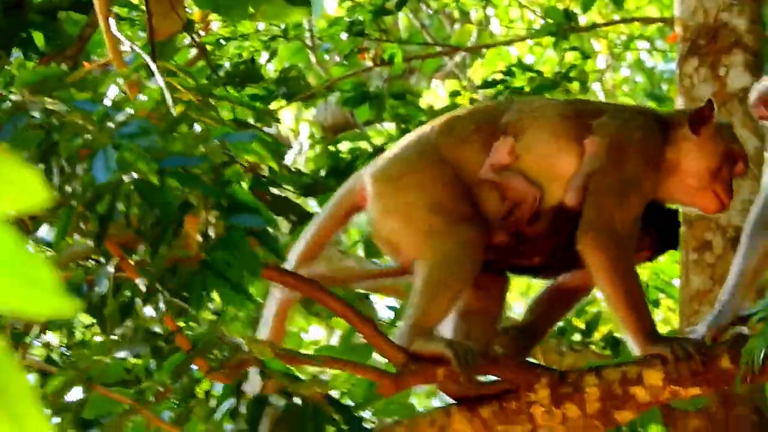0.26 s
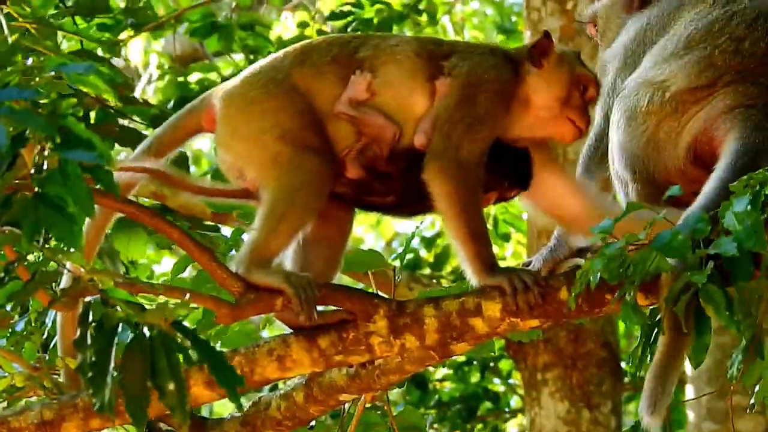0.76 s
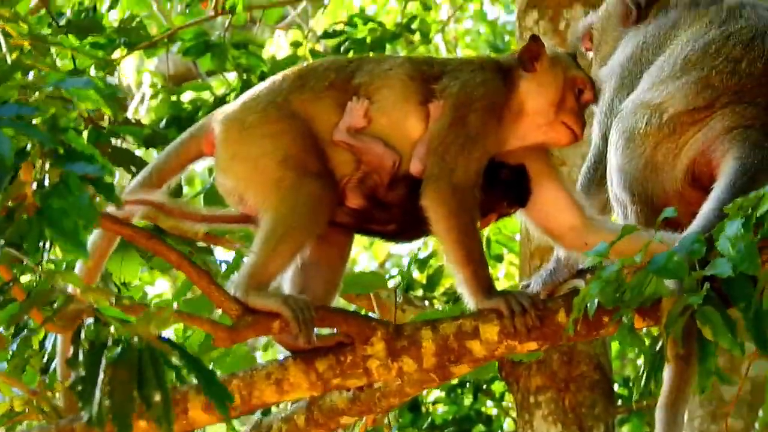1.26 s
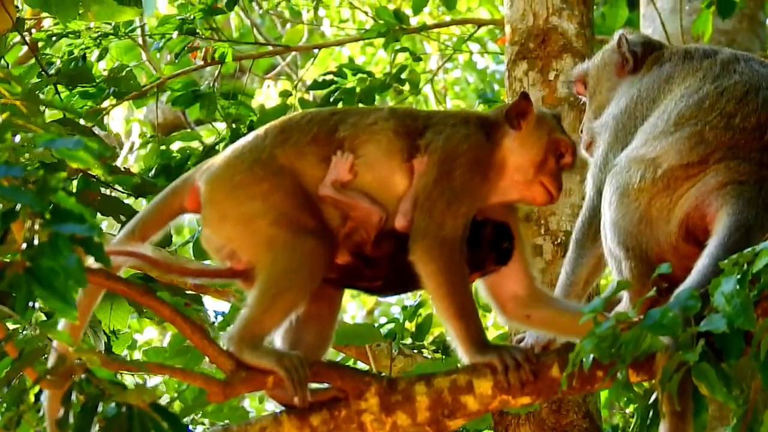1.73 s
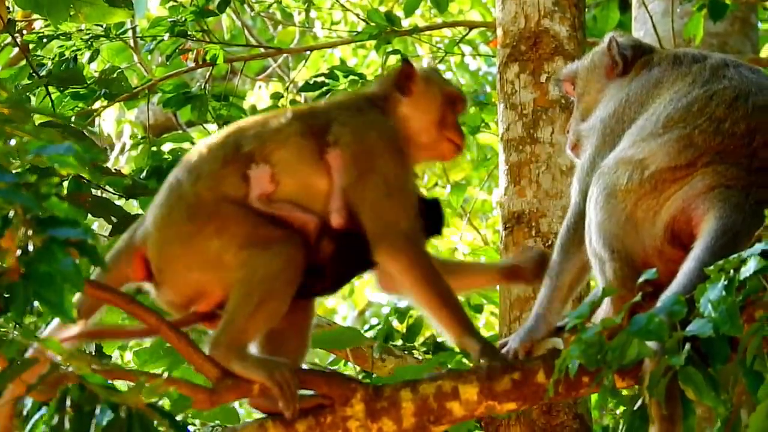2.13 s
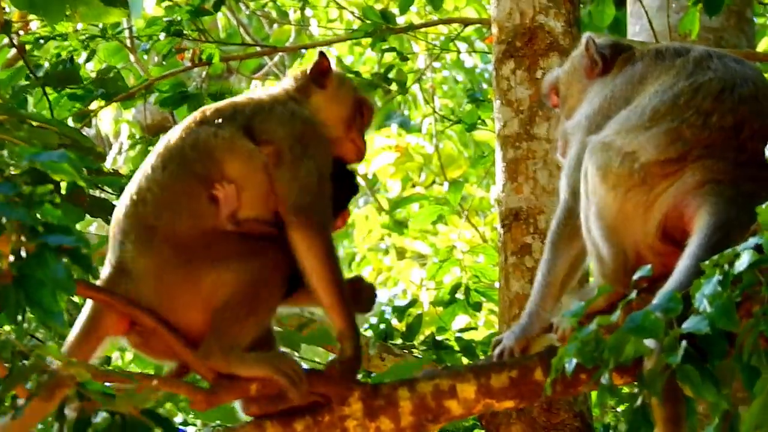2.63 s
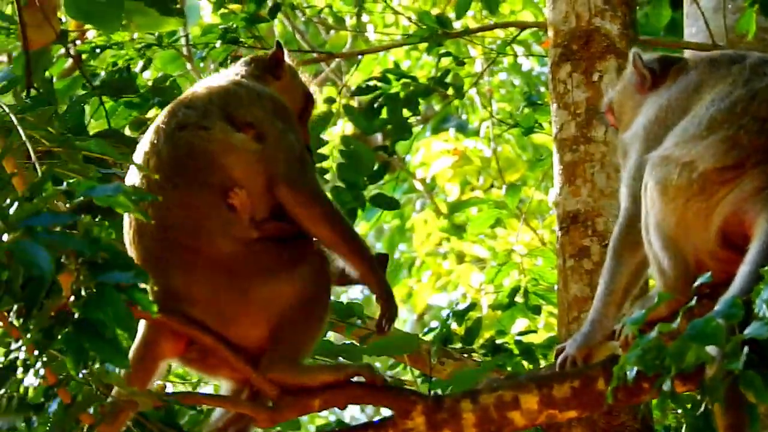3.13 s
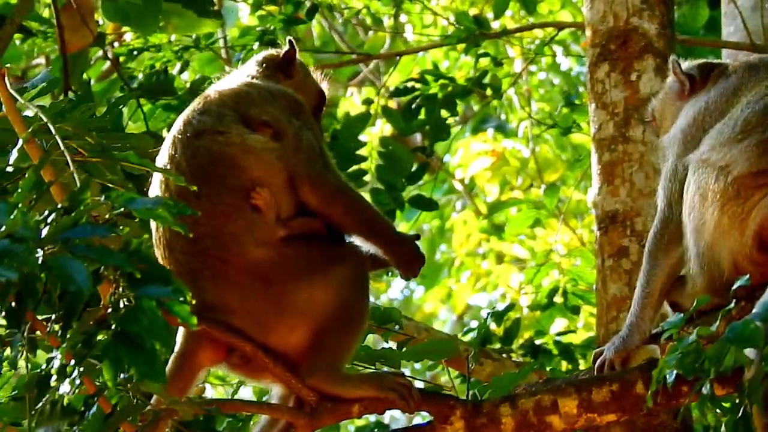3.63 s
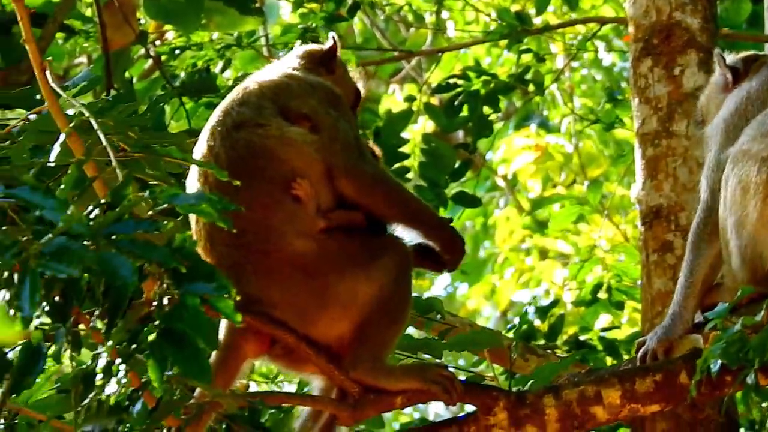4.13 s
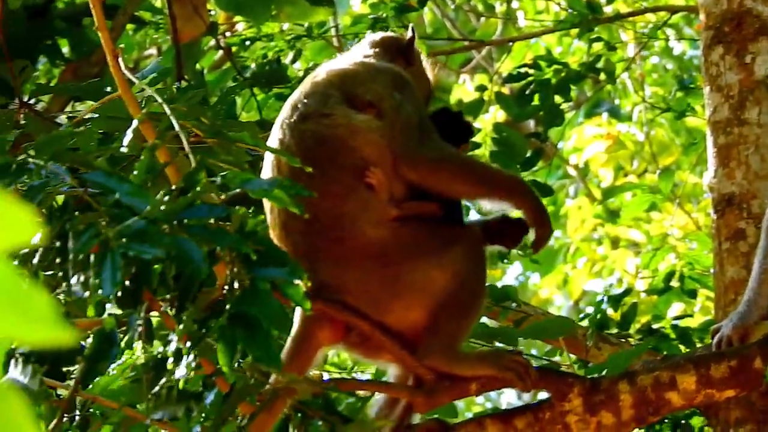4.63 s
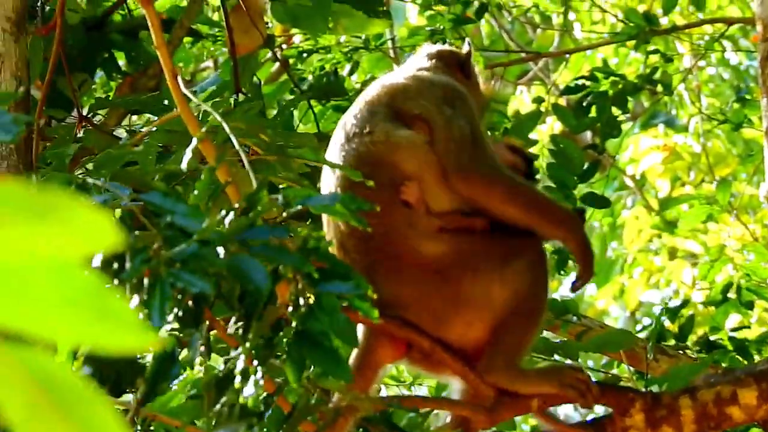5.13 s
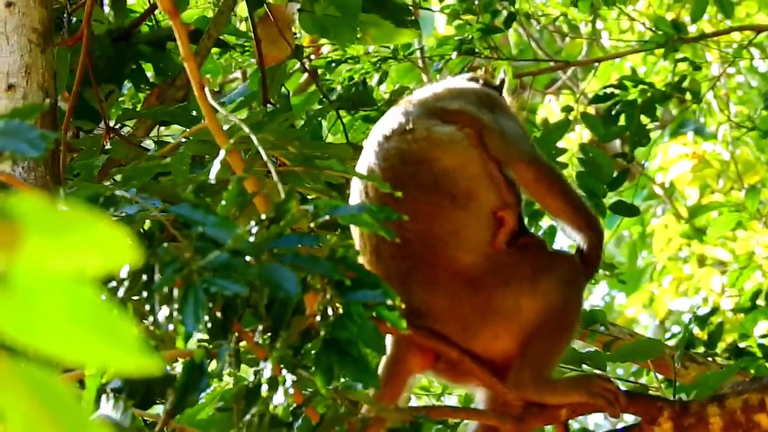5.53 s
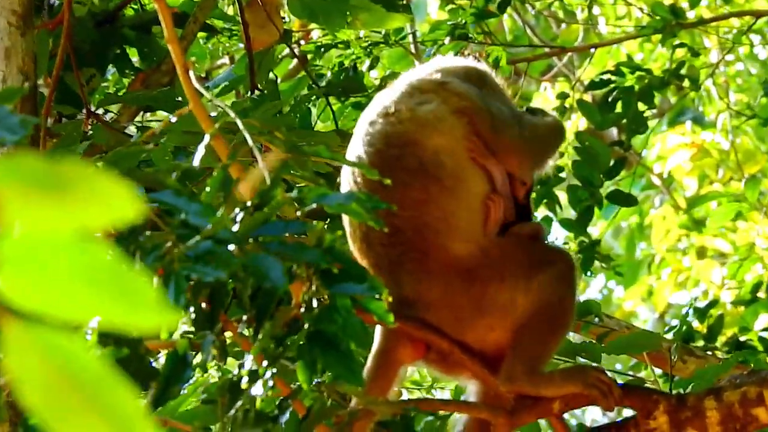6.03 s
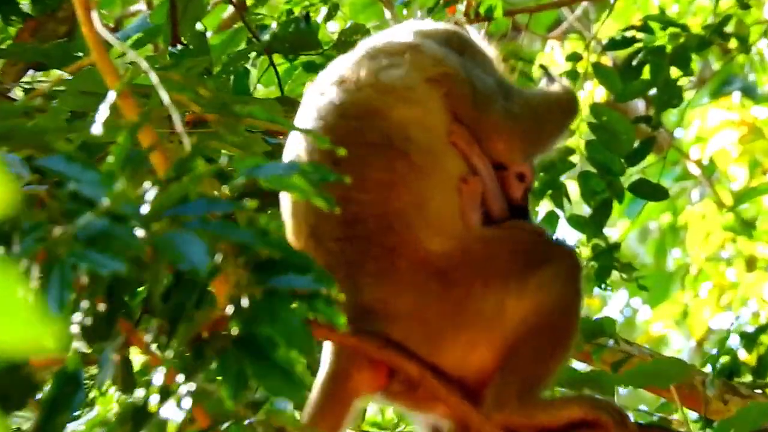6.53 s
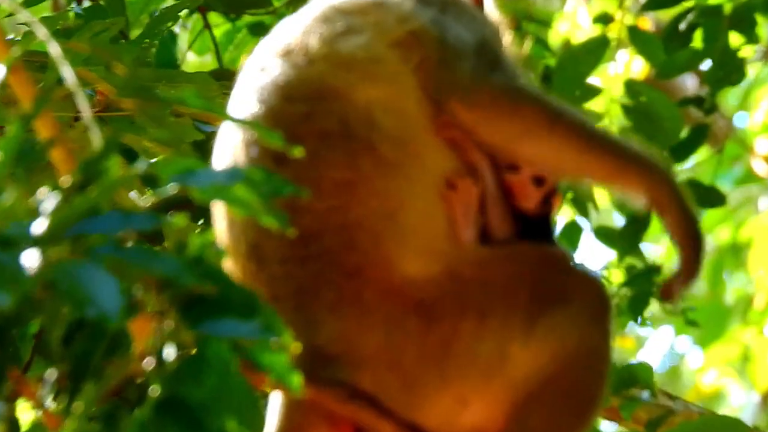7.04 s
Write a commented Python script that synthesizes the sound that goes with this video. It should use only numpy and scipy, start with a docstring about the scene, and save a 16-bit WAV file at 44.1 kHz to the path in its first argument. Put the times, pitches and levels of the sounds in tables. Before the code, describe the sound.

Monkeys give thin, high chirps and a few piercing squeals among trees, with small twig snaps over a faint forest hush.

```python
"""Macaques squeal in the treetops: two piercing screams close by, a rasp, a coo and thin chirps farther off.
Each voice is a sliding tone that turns rough when the vocal folds swing unevenly; the throat colours it.
A small bird trills, twigs snap, leaves swish and rustle; the foliage scatters every call into a bright tail.
Under it lie a faint forest hush, insects, a hollow far-off sound and the rumble of a hand-held camera."""
import sys
import numpy as np
from scipy import signal
from scipy.fft import rfft, irfft
from scipy.io import wavfile
from scipy.ndimage import map_coordinates

SR = 44100
rng = np.random.default_rng(int(sys.argv[2]) if len(sys.argv) > 2 else 0)


def to_wav(s):
    """Save 16-bit WAV."""
    ch = np.atleast_2d(s).T  # columns
    pcm = np.round(np.clip(ch, -1, 1) * 32767)  # PCM
    wavfile.write(sys.argv[1], SR, pcm.astype(np.int16))


N = 321048
TIME = np.arange(N) / SR


def squeals():
    """Whistle-high macaque screams: the throat boosts some pitches as the voice sweeps through them."""
    # one table a squeal: (time [s], pitch [Hz], level before the throat [dB], roughness [0-1])
    calls = [
        [(2.42, 7040, -44, .6), (2.447, 6780, -33, 0.78), (2.56, 5590, -42.5, 0.51), (2.70, 5350, -59, 0.53)],
        [(4.955, 2770, -21, 0.2), (4.969, 3885, -28.5, 0.24), (4.975, 4380, -22, 0.3),
         (5.008, 8370, -29.5, 0.37), (5.05, 9310, -31.5, 0.06), (5.12, 8360, -32.5, 1), (5.18, 7380, -29, 0.84),
         (5.216, 6304, -16.5, 0.7), (5.24, 5870, -26.5, 0.42), (5.262, 6840, -20, .04), (5.275, 7050, -22, .04),
         (5.298, 8300, -34.5, .08), (5.352, 8600, -28, 0.09), (5.375, 9420, -29.5, 0.04),
         (5.398, 7690, -24, 0.5), (5.41, 6570, -24, 0.67), (5.424, 6380, -39.5, 0.37)],
        [(5.686, 6710, -34, .4), (5.693, 7240, -25.5, 0.33), (5.701, 8770, -13, .06),
         (5.724, 9810, -22.5, 0.04), (5.755, 8020, -37, 0.17), (5.764, 7020, -18.5, 0.13),
         (5.78, 6005, -30.5, 0.14), (5.80, 5556, -26, 0), (5.816, 5030, -26, 0.25), (5.825, 3730, -29, 0.42),
         (5.84, 3800, -27.5, 0.05)],
    ]
    # how the throat boosts or weakens the voice: (frequency [Hz], gain [dB])
    throat = [(300, -45.5), (1500, -24), (2800, -8), (3400, -7), (3800, -5.5), (4400, 5.5), (5000, 2),
              (5650, 4), (6200, 4.5), (6900, 2.5), (8000, 1), (8800, -5.5), (9700, -6.5), (15000, -2)]
    out = np.zeros(N)
    for rows in calls:
        add(out, rows[0][0], strained_voice(*contour(rows)))
    return filtered(out, throat)


def strained_voice(hz, db, rough):
    """One wavering squeal: a second vibration adds side tones, and harsh stretches add rushing air."""
    # rushing air in a harsh squeal: (frequency [Hz], level [dB])
    rasp = [(1470, -61.5), (2500, -34.5), (2740, -20), (4430, -8), (4820, -18.5), (6540, -19.5),
            (7740, -21.5), (8740, 1.5), (11400, -5.5), (15500, -42)]
    # breath ringing in the throat: (frequency [Hz], level [dB])
    throat_ring = [(3000, -44.5), (4300, -19), (5200, -12.5), (5600, 5), (6000, -15.5), (6800, -13.5),
                   (9000, -23), (15000, -37.5)]
    size, waver_hz = len(hz), 130
    hz = hz * (1 + .015 * wobble(waver_hz, size))
    db = db + 1.2 * wobble(waver_hz, size)
    voice = vocal_folds(hz, rough, [(1, 3.5), (2, -24.5)], jitter=0.1547, jitter_hz=898, shimmer=.45)
    second_hz = np.full(size, 3778.8)
    second = vocal_folds(second_hz, rough, [(1, 0)], jitter=0.039, jitter_hz=396, shimmer=1.0)
    voice = voice * (1 + gain_of(-25) * second) + rough * gain_of(-16) * second
    air = gain_of(-6) * rough ** 2 * noise(rasp, size)
    breath = gain_of(-19) * noise(throat_ring, size)
    return gain_of(db) * (voice + air + breath) * signal.windows.tukey(size, .02)


def vocal_folds(hz, rough, harmonics, jitter, jitter_hz, shimmer):
    """The rougher the folds swing, the more their pitch (jitter) and strength (shimmer) stagger."""
    size = len(hz)
    shaky_hz = hz * (1 + jitter * rough * wobble(jitter_hz, size))
    phase = 2 * np.pi * np.cumsum(shaky_hz) / SR
    tone = sum(gain_of(db) * np.sin(multiple * phase) for multiple, db in harmonics)
    return evened(tone * np.exp(shimmer * rough * wobble(jitter_hz / 2, size)))


def yelps():
    """The scream cracks into short, lower yelps."""
    # (time [s], length [s], start pitch [Hz], end pitch [Hz], level [dB], left over right [dB])
    calls = [(4.951, 0.017, 2194, 2910, -40, -1.5), (5.194, .022, 3682, 3850, -26.5, -1),
             (5.402, 0.016, 3560, 4820, -24, -0.5), (5.819, 0.018, 4057, 3520, -30.5, 0)]
    return glides(calls, swell=0.46)


def low_calls():
    """Lower calls and a faint nasal whine: voices with clear harmonics, shaped by an open mouth."""
    # one table a call: (time [s], pitch [Hz], level before the mouth [dB], roughness [0-1])
    calls = [
        [(4.314, 3920, -63, 0.07), (4.332, 3720, -43.5, 0.23), (4.352, 2887, -37, 0.47),
         (4.374, 2400, -34, 0.24), (4.405, 2503, -43.5, 0.42), (4.43, 2650, -56, 0.25)],
        [(4.425, 1510, -66, 0.03), (4.445, 1390, -51.5, 0.2), (4.52, 1442, -49, .05), (4.68, 1514, -49.5, 0.14),
         (4.77, 1584, -56, 0.37)],
    ]
    whine = [(3.88, 625, -57, 0.22), (4.0, 636.4, -62, 0), (4.12, 630.7, -61.5, 0), (4.22, 640, -60, 0.1)]
    # the tones in each voice: (multiple of the pitch, level [dB])
    call_harmonics = [(1, 1), (2, -4), (3, -24)]
    whine_harmonics = [(3, -7), (4, 0), (5, -4), (6, -13), (7, -14)]
    # how the mouth boosts or weakens the voice: (frequency [Hz], gain [dB])
    open_mouth = [(600, -2), (1400, 0), (2500, 0), (3700, -0.5), (4400, 10), (5400, -9), (6200, -31),
                  (12000, -31)]
    voices = [(rows, call_harmonics) for rows in calls] + [(whine, whine_harmonics)]
    out = np.zeros(N)
    for rows, harmonics in voices:
        hz, db, rough = contour(rows)
        voice = vocal_folds(hz, rough, harmonics, jitter=0.2, jitter_hz=521, shimmer=0.78)
        add(out, rows[0][0], gain_of(db) * voice * signal.windows.tukey(len(hz), .05))
    return filtered(out, open_mouth)


def warble(start_s=3.965, length_s=0.11, pitch_hz=6785, flick_hz=672, flicks_per_s=29):
    """One thin note whose pitch flicks upward again and again."""
    out, t = np.zeros((2, N)), np.arange(0, length_s, 1 / SR)
    flicks = np.sin(np.pi * flicks_per_s * t) ** 4
    call = note(pitch_hz + flick_hz * flicks, rough=.04, db=-33.5, swell=0.96)
    add(out, start_s, panned(call, pan_db=6.5))
    return out


def chirps():
    """Short, thin calls from farther off, and one high sliding tone within the rasp at 4.36 s."""
    # (time [s], length [s], start pitch [Hz], end pitch [Hz], level [dB], left over right [dB])
    calls = [ (0.0, 0.075, 7700, 7440, -46, 4), (0.031, 0.024, 7640, 6100, -45.5, 6),
             (0.524, 0.05, 5290, 4780, -60, -1), (0.589, 0.071, 6720, 5960, -56, -2),
             (0.755, 0.027, 6880, 5500, -44, 4.5), (0.858, 0.083, 7150, 6940, -49.5, 5),
             (1.04, 0.024, 7100, 5600, -42.5, 7), (1.146, 0.047, 6450, 6270, -33, -2),
             (1.612, 0.09, 6900, 3900, -50, 1), (1.823, 0.16, 7070, 6650, -42, 0.5),
             (2.148, 0.16, 6920, 6620, -57.5, 5), (2.589, 0.087, 7460, 7880, -45, 4),
             (2.952, 0.044, 7260, 6700, -42.5, 0), (3.037, 0.026, 6970, 6850, -45.5, 3),
             (3.209, 0.19, 6730, 5650, -41, -2), (3.361, 0.17, 5800, 7275, -37, -0.5),
             (3.675, 0.047, 3430, 3860, -76, 0), (4.088, 0.079, 5550, 5200, -52, -5),
             (4.357, 0.084, 5630, 5060, -45, -1), (4.546, 0.11, 6740, 7850, -50, 3),
             (4.818, .13, 6820, 5950, -39.5, -1.5), (6.096, 0.092, 7150, 8080, -46, 4),
             (6.316, 0.065, 7670, 6200, -55, 7), (6.692, 0.11, 6350, 5280, -54, 6.5),
             (7.092, 0.11, 6790, 6100, -42.5, -5.5), (7.125, 0.1, 6730, 7600, -37.5, 5),
             (7.171, 0.22, 6150, 6300, -37, -1)]
    return glides(calls, swell=.63)


def glides(rows, swell):
    """Notes that slide fast at first, then settle on their end pitch."""
    out = np.zeros((2, N))
    for s, length, start_hz, end_hz, db, pan_db in rows:
        hz = end_hz + (start_hz - end_hz) * np.linspace(1, 0, int(length * SR)) ** 1.6
        rough = 0.085 + 0.81 * length  # longer notes are rougher
        add(out, s, panned(note(hz, rough, db, swell), pan_db))
    return out


def note(hz, rough, db, swell):
    """A nearly pure tone that grows and fades; a larger swell makes the hump narrower."""
    progress = np.linspace(0, 1, len(hz))
    voice = vocal_folds(hz, rough, [(1, 4), (2, -54.0)], jitter=.18, jitter_hz=554, shimmer=0.27)
    return gain_of(db) * voice * (4 * progress * (1 - progress)) ** swell


def bird_trill(first_top_hz=5590, sink_hz_per_s=1300, note_s=0.0382, rise_hz=976):
    """A small bird repeats one rising and falling note, a little lower each time."""
    # the bird's notes: (time [s], level [dB])
    notes = [(1.108, -47), (1.24, -39), (1.322, -45), (1.394, -44), (1.459, -48.5), (1.522, -46.5),
             (1.58, -44)]
    out = np.zeros(N)
    progress = np.linspace(0, 1, int(note_s * SR))
    below_top_hz = rise_hz * (progress / 0.593 - 1) ** 2  # highest just past the middle
    for s, db in notes:
        top_hz = first_top_hz - sink_hz_per_s * (s - notes[0][0])
        add(out, s, note(top_hz - below_top_hz, rough=0.16, db=db, swell=1))
    return out


def wood():
    """Twigs snap sharply and wood knocks dully."""
    # (time [s], peak level [dB], ringing pitch [Hz])
    snaps = [(0.285, -48, 6460), (2.0743, -34, 6230), (2.153, -25.5, 5900), (2.4105, -25, 6750),
             (2.728, -28.5, 6740), (3.0466, -31.5, 7000), (3.3631, -26, 5920), (3.8757, -25.5, 6300),
             (4.894, -22.5, 5540)]
    knocks = [(1.213, -52, 1020), (2.06, -44.5, 1150), (3.425, -50, 960), (4.693, -49, 1530),
              (4.758, -41.5, 1330), (4.884, -43.5, 1850), (5.664, -38.5, 1010), (6.209, -32, 1290),
              (6.329, -35.5, 1325), (6.713, -44, 1016), (7.209, -37.5, 1995)]
    sharp = cracks(snaps, decay_s=0.00037, width_octaves=.42, hiss_db=-37)
    dull = cracks(knocks, decay_s=.0021, width_octaves=0.59, hiss_db=-61.5)
    return sharp + dull


def cracks(rows, decay_s, width_octaves, hiss_db):
    """Wood gives way: a few milliseconds of crackle, ringing loosely around one pitch."""
    out, t = np.zeros(N), np.arange(2048) / SR
    f = np.fft.rfftfreq(len(t), 1 / SR)
    for s, db, hz in rows:
        ring = np.exp(-(np.log2((f + 1) / hz) / width_octaves) ** 2)
        hiss = gain_of(hiss_db) * f / (f + hz)
        crackle = irfft(rfft(rng.standard_normal(len(t))) * (ring + hiss))
        burst = crackle * t / decay_s * np.exp(-t / decay_s)
        add(out, s, gain_of(db) * burst / abs(burst).max())
    return out


def swishes():
    """Leaves slide over each other in clumps of tiny ticks."""
    # leaves brushing: (time [s], length [s], level [dB])
    brushes = [(0.87, 0.15, -63), (1.59, 0.068, -70.5), (3.094, 0.058, -52.5), (3.675, 0.078, -45.5),
               (3.88, 0.045, -76), (4.323, 0.087, -62.5)]
    # their bright hiss: (frequency [Hz], level [dB])
    colour = [(880, -73), (1500, -35), (1590, -59), (2220, -27), (2940, -37), (3580, -5.5), (4310, -10.5),
              (6310, -9), (7600, 1.5), (10200, -14), (15500, -33)]
    out = np.zeros(N)
    for s, length, db in brushes:
        size = int(length * SR)
        ticks = evened(noise(colour, size) * gain_of(4 * wobble(330, size)))
        add(out, s, gain_of(db) * ticks * signal.windows.tukey(size, .5))
    return out


def forest(sound, leaves_db, tail_db, scatter_s):
    """The direct sound, quick echoes from nearby leaves, and a longer tail from the trunks."""
    # how long the tail rings: (frequency [Hz], time to fade by 60 dB [s])
    fade_times = [(200, 0.32), (1500, 0.41), (4000, 0.36), (7000, 0.31), (10000, 0.32), (15000, 0.21)]
    t, echoes_per_s = np.arange(SR) / SR, 3000
    strengths = rng.standard_normal((2, 2, SR))
    arrivals = (rng.random((2, 2, SR)) < echoes_per_s / SR) * (t > .001)
    leaf_echoes, trunk_echoes = strengths * arrivals
    near = leaf_echoes * np.exp(-t / scatter_s)
    hz, at, spectrum = signal.stft(trunk_echoes * (1 - np.exp(-t / 0.04)), SR, nperseg=256)
    fade = gain_of(-60 * at / value_at(fade_times, hz)[:, None])
    tail = signal.istft(spectrum * fade, SR, nperseg=256)[1][:, :SR]
    near = gain_of(leaves_db) * near / np.linalg.norm(near[0])
    tail = gain_of(tail_db) * tail / np.linalg.norm(tail[0])
    response = stereo(*(near + tail), side_db=-1.5)
    response[:, 0] += 1  # the direct sound
    response /= np.linalg.norm(response.mean(0))
    return signal.fftconvolve(np.atleast_2d(sound), response, axes=1)[:, :N]


def rustles():
    """Leaves stir with a dry rustle now and then."""
    # (time [s], length [s], level [dB])
    stirs = [(.6, 0.32, -51), (1.5, 0.26, -66), (2.81, .44, -52), (3.84, 0.22, -50.5), (5.08, .25, -47.5),
             (6.12, 0.066, -69), (7.1, 0.2, -58)]
    # their dry hiss: (frequency [Hz], level [dB])
    colour = [(250, -47.5), (500, -23.5), (1000, -10), (1600, -7), (2330, 3), (2600, -3), (2880, 0.5),
              (3400, -4), (3950, -9), (4800, -24.5), (6500, -39), (11000, -42)]
    return bed(colour) * swells(stirs, rise_s=0.098, sag_db_per_s=3.5, fade_db_per_s=57.5)


def camera_rumble():
    """The hand's grip makes a steady rumble, with a few soft bumps."""
    # bumps of the hand: (time [s], length [s], level [dB])
    touches = [(.64, 0.22, -59), (1.58, .25, -72), (1.895, 0.067, -52), (2.05, 0.13, -60.5),
               (3.72, .14, -53.5), (6.2, 0.23, -68.5), (6.62, .33, -60)]
    # the rumble: (frequency [Hz], level [dB])
    colour = [(15, -42.5), (25, -26.5), (50, -8.5), (102, 4.5), (200, -3), (246, -8), (358, -8.5),
              (501, -20), (568, -14.5), (700, -16), (910, -45), (1540, -120)]
    grip = gain_of(-73.5)
    bumps = swells(touches, rise_s=0.062, sag_db_per_s=23.5, fade_db_per_s=54.5)
    return bed(colour, flutter_db=3.5) * np.hypot(grip, bumps)


def far_sound():
    """A hollow far-off sound swells and fades."""
    # (time [s], length [s], level [dB])
    events = [(1.6, 0.46, -69), (2.6, 1.0, -72), (5.93, 0.41, -60.5), (6.48, 0.27, -60), (7.0, 0.24, -64.5)]
    # its hollow tone: (frequency [Hz], level [dB])
    colour = [(150, -3), (300, -13), (520, -12.5), (700, -6.5), (930, -2.5), (1200, -6), (1600, -14.5),
              (2500, -11.5), (4000, -28), (9900, -76)]
    return bed(colour, flutter_db=1) * swells(events, rise_s=0.045, sag_db_per_s=-1.5, fade_db_per_s=30)


def insects():
    """Insects make a high hiss that drifts in loudness."""
    # (time [s], level [dB])
    levels = [(0, -55), (.45, -90), (.7, -67), (2.3, -67.5), (4.3, -72.5), (6.2, -69.5), (6.6, -72),
              (7.28, -70)]
    # their hiss: (frequency [Hz], level [dB])
    colour = [(500, -23), (3000, -23.5), (4500, -8), (5500, -4.5), (6400, 10), (7400, -11), (8500, -40.5),
              (15000, -38)]
    return bed(colour, level_db=np.interp(TIME, *np.transpose(levels)), flutter_db=1)


def hush():
    """The faint, steady hush of the forest."""
    # (frequency [Hz], level [dB])
    colour = [(20, -33.5), (38, -23.5), (52, 4), (65, -13), (100, 2), (193, -7), (274, -20.5), (359, -23.5),
              (520, -17), (1950, -21), (2600, -27), (5140, -33.5), (15500, -36)]
    return bed(colour, level_db=-72.5)


def bed(colour, level_db=0, flutter_db=0):
    """A layer of stereo noise whose loudness can flutter."""
    sound = stereo(noise(colour, N), noise(colour, N), side_db=-0.5)
    return sound * gain_of(level_db + flutter_db * wobble(9.1, N))


def swells(rows, rise_s, sag_db_per_s, fade_db_per_s):
    """Loudness over time: each event rises, sags (or grows, if the sag is negative), then dies away."""
    power = np.zeros(N)
    for s, length, db in rows:
        t = np.maximum(TIME - s, 0)
        rise = np.sin(np.pi / 2 * np.minimum(t / rise_s, 1)) ** 2
        fall_db = sag_db_per_s * t + fade_db_per_s * np.maximum(t - length, 0)
        power += (rise * gain_of(db - fall_db)) ** 2
    return np.sqrt(power)


def flicker(sound, depth_db=3.5, patch_s=.035, patch_hz=189.4):
    """Lets small patches of time and pitch grow louder or softer on their own."""
    hz, at, spectrum = signal.stft(sound, SR, nperseg=512)
    grid = np.meshgrid(hz / patch_hz, at / patch_s, indexing="ij")
    patches = map_coordinates(rng.standard_normal((400, 800)), grid, order=1, mode="wrap")
    gains = evened(gain_of(depth_db * evened(patches)))
    return signal.istft(spectrum * gains, SR, nperseg=512)[1][:, :N]


def stereo(middle, side, side_db):
    """Two close microphones: they share the bass, while the treble drifts apart."""
    side = gain_of(side_db) * filtered(side, [(200, -16.0), (2200, -11), (5000, -1.5)])
    return np.array([middle + side, middle - side])


def panned(sound, pan_db):
    """Makes the left side pan_db louder than the right."""
    return gain_of([[pan_db / 2], [-pan_db / 2]]) * sound


def contour(rows):
    """Joins the rows of a call by straight lines."""
    times, *columns = np.transpose(rows)
    t = np.arange(times[0], times[-1], 1 / SR)
    return [np.interp(t, times, column) for column in columns]


def noise(colour, size):
    """Noise of strength 1 with the given balance of low and high."""
    return evened(filtered(rng.standard_normal(size), colour))


def wobble(hz, size):
    """Random motion of strength 1, no faster than about hz."""
    f = np.fft.rfftfreq(size, 1 / SR)
    return evened(irfft(rfft(rng.standard_normal(size)) / (1 + (f / hz) ** 2), size))


def filtered(sound, colour):
    """Turns each frequency up or down by a table of (frequency [Hz], gain [dB])."""
    hz = np.fft.rfftfreq(len(sound), 1 / SR)
    return irfft(rfft(sound) * gain_of(value_at(colour, hz)), len(sound))


def value_at(points, hz):
    """Reads between the rows of a frequency table, with octaves evenly spaced."""
    f, value = np.transpose(points)
    return np.interp(np.log(hz + 1), np.log(f + 1), value)


def gain_of(db):
    """Turns decibels into a factor to multiply by."""
    return 10 ** (np.asarray(db) / 20)


def evened(x):
    """Scales to an average strength (rms) of 1."""
    return x / np.sqrt(np.mean(np.abs(x) ** 2) + 1e-20)


def add(mix, start_s, sound):
    """Mixes a sound in at its start time."""
    part = mix[..., max(round(start_s * SR), 0):][..., :sound.shape[-1]]
    part += sound[..., :part.shape[-1]]


def scene():
    """Callers, wood and leaves echo through the foliage, over a quiet background."""
    screams = forest(squeals() + yelps() + warble(), leaves_db=-2, tail_db=-5.5, scatter_s=0.021)
    low = forest(low_calls(), leaves_db=-4, tail_db=-4, scatter_s=0.016)
    distant = forest(chirps(), leaves_db=-3.5, tail_db=-1.5, scatter_s=0.011)
    bird = forest(bird_trill(), leaves_db=-4, tail_db=-5, scatter_s=0.013)
    branches = forest(wood() + swishes(), leaves_db=-3, tail_db=-6.5, scatter_s=0.013)
    background = flicker(rustles() + far_sound() + insects() + hush()) + camera_rumble()
    return screams + low + distant + bird + branches + background


def record(dry):
    """Cuts off the very highest treble."""
    cutoff_hz = 15700
    low_pass = signal.firwin(511, cutoff_hz, window=("kaiser", 9), fs=SR)
    return signal.oaconvolve(dry, low_pass[None], "same")


dry = scene()
out = record(dry)
to_wav(out)
```